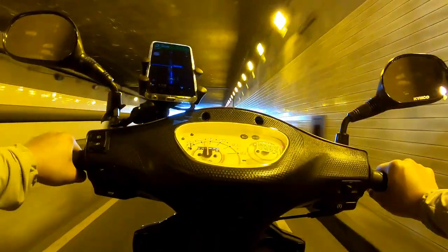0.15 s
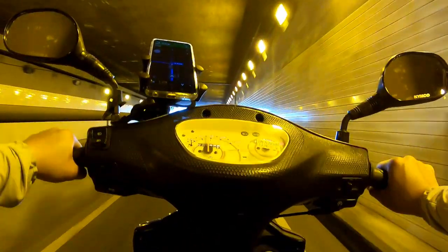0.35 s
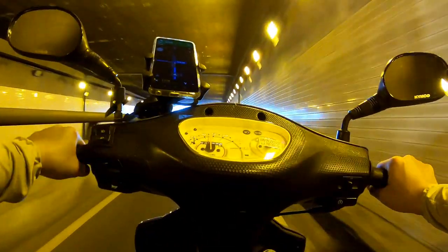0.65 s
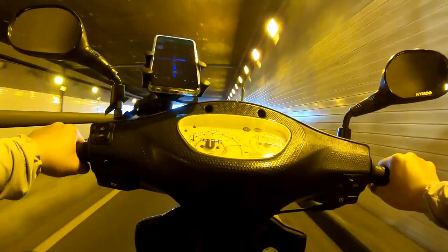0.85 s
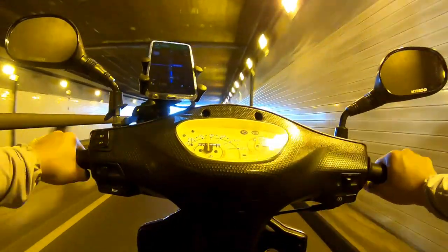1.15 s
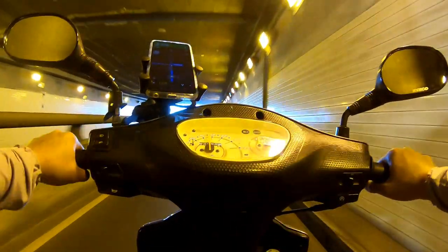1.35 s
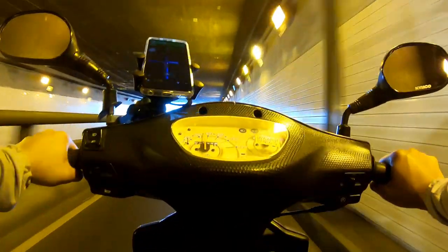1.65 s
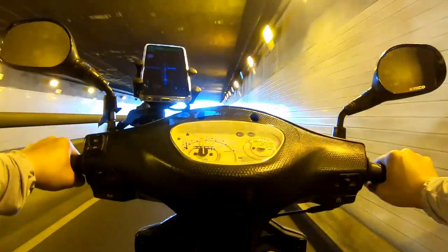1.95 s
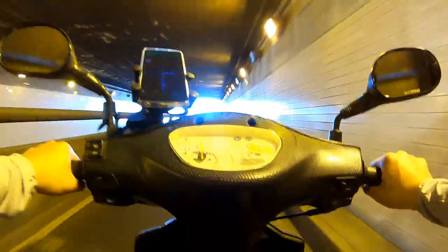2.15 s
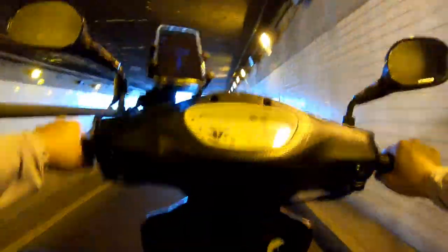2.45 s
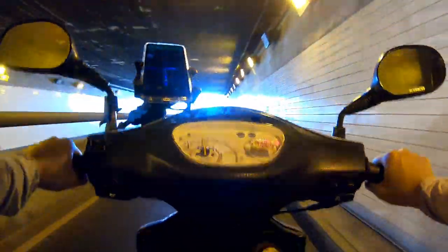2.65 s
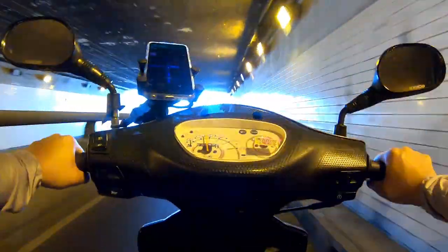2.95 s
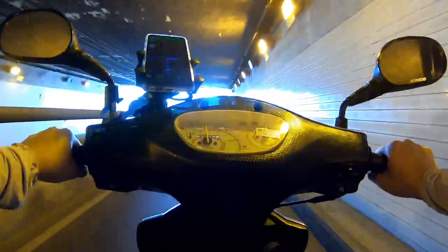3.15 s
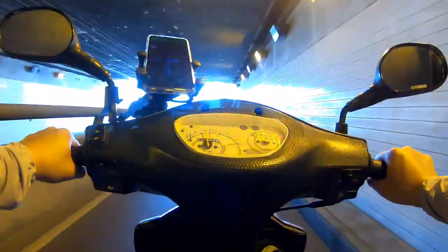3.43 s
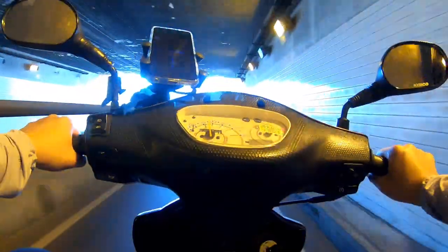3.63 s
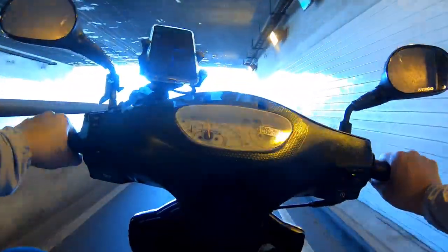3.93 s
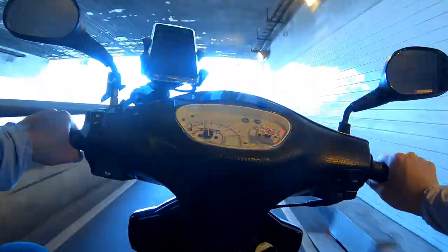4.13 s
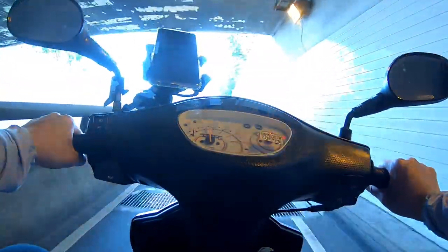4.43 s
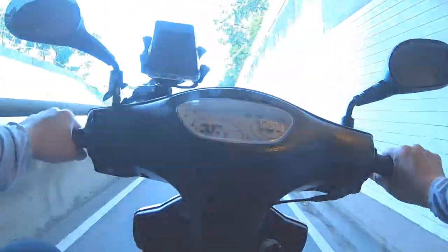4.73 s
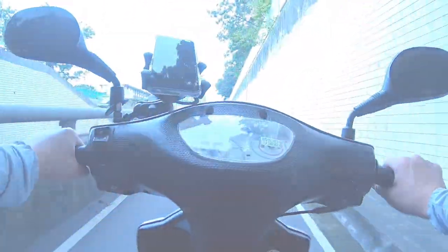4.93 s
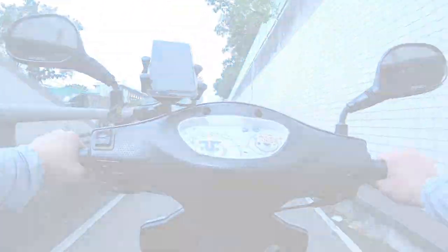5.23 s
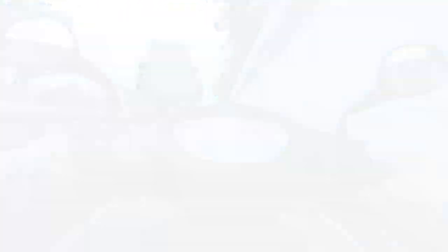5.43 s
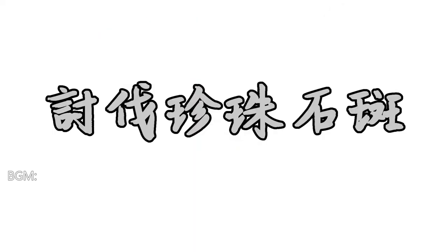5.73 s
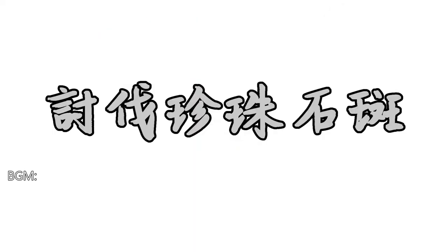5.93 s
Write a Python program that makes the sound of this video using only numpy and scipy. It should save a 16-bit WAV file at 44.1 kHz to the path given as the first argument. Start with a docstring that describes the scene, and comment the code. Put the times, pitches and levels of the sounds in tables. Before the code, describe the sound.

Strong, rough wind batters a close microphone throughout a scooter ride, thumping, tearing and spitting irregular pops. The little engine hums close by, raspy and slightly wavering, its boom swelling and fading with the tunnel's short dull echo. Its pitch dips slightly, then gradually recovers, with a faint high whine returning later. Airy road hiss continues until the sound is cut dead, followed by silence.

```python
"""Wind pounds a microphone at a rider's chest as a small four-stroke scooter cruises through a road tunnel.
Its gusts, flutter, rush, crackles and pops are shaped noise and single spikes over the hiss of tyres and air.
Close by, the engine's orders drone, boom and rasp as wavering sines, its covers buzz as resonant noise,
and the final drive whines; sizzles flare briefly and the tube echoes the machine.
The throttle eases briefly, then opens again. The sound is cut off abruptly, leaving silence."""
import sys
import numpy as np
from scipy import signal
from scipy.fft import rfft, irfft, next_fast_len
from scipy.io import wavfile
from scipy.ndimage import uniform_filter1d, map_coordinates

SR = 44100
rng = np.random.default_rng(int(sys.argv[2]) if len(sys.argv) > 2 else 0)


def store_pcm(level_fs):
    """Save levels as 16-bit WAV."""
    pcm = np.round(np.clip(level_fs, -1, 1) * 32767).astype(np.int16)
    wavfile.write(sys.argv[1], SR, np.atleast_2d(pcm).T)


N = 268200


def amp(db):
    """Decibels to gain."""
    return 10 ** (np.asarray(db) / 20)


def unit(x):
    """x at rms 1."""
    return x / np.sqrt(np.mean(x ** 2) + 1e-20)


def even(x, seconds):
    """x at rms 1 in every stretch of the given length."""
    return x / np.sqrt(np.abs(uniform_filter1d(x ** 2, int(seconds * SR))) + 1e-9)


def along(points, hz):
    """(Hz, value) points read on a log frequency axis."""
    f, v = np.transpose(points)
    return np.interp(np.log(hz + 1), np.log(f + 1), v)


def clock():
    """The time of every sample, in seconds."""
    return np.arange(N) / SR


def curves(rows):
    """One value per sample for each column after the time."""
    s, *cols = np.transpose(rows)
    return [np.interp(clock(), s, c) for c in cols]


def bump(s, half_length):
    """A smooth rise to 1 and fall around the time s."""
    return np.exp(-.5 * ((clock() - s) / half_length) ** 2)


def wobble(rate):
    """A smooth random curve, rate knots a second."""
    return map_coordinates(rng.standard_normal(int(N * rate / SR) + 4), [clock() * rate])


def filtered(x, response):
    """x times a response of frequency."""
    m = next_fast_len(N + SR // 2)
    spectrum = rfft(x, m) * response(np.fft.rfftfreq(m, 1 / SR))
    return irfft(spectrum, m)[:N]


def coloured(x, spectrum):
    """x shaped by (Hz, dB) points, at rms 1."""
    return unit(filtered(x, lambda hz: amp(along(spectrum, hz))))


def noise(spectrum, swell_db=0):
    """Noise of rms 1 whose source strength follows swell_db."""
    return coloured(rng.standard_normal(N) * amp(swell_db), spectrum)


def partial(cycles, db, flicker_db, smear):
    """One line, its level (dB) and phase (smear, radians) shaken by moving air and wall echoes."""
    level = np.sqrt(2) * amp(db + flicker_db * wobble(9))
    turns = cycles + rng.random()
    return level * np.sin(2 * np.pi * turns + smear * wobble(16))


# Strength of the airstream along the ride: time_s, flow_db
AIRSTREAM = [(0, -1), (.2, 0), (.6, -1), (1.43, .5), (1.62, -2), (2, -0.26), (2.8, -0.1), (3, -1.5),
             (3.55, -1), (3.9, 1.2), (4.85, 1.5), (5.54, 1)]


def airstream():
    """The flow in dB, which drives the wind, the covers and the rasp."""
    return curves(AIRSTREAM)[0]


# Strong gusts at the microphone, lulls where negative:
# centre_s, half_length_s, buffet_rise_db, flutter_rise_db, rush_rise_db
GUSTS = [(0.125, 0.0091, -16.5, -10, -2.5), (0.144, .004, -0.5, 0, 8.5), (0.414, 0.033, 3.5, 3, 1.5),
         (0.615, 0.092, -4, 2, -0.5), (.725, 0.0098, 0, 5, -0.5), (1.16, 0.03, 1.5, 5.5, -2),
         (1.264, 0.016, 3.5, 7, -3.5), (1.45, 0.022, -1, 2, 2), (1.584, 0.0096, -3.5, -8.5, -1.5),
         (2.057, 0.04, 3, 2, 1), (2.482, 0.026, 2, 4.5, 2), (2.795, 0.017, 6.5, 5, -1),
         (2.898, 0.03, 5, 2, 0), (3.172, 0.02, 1.5, 3, -3.5), (3.29, 0.017, 4, 3.5, 1.5),
         (3.401, 0.019, 6, 4, 1.5), (4.179, 0.012, 9.5, 5.5, -0.5), (4.234, 0.019, -4.5, -4.5, 1),
         (4.367, 0.015, 6, -2, 2), (4.55, .03, 3, 2, 0), (5.175, 0.042, 3, 2.5, 0.5),
         (5.299, .012, 3.5, -1, -3.5), (5.395, 0.0096, 6.5, 7, -1), (5.45, 0.023, 2, 3, 0.5)]


def gust_rises():
    """How far each gust lifts the buffet, the flutter and the rush, in dB."""
    return [sum(row[column] * bump(row[0], row[1]) for row in GUSTS) for column in (2, 3, 4)]


# Deep thump of air on the microphone, relative: pitch_hz, level_db_per_hz
BUFFET = [(12, -21), (22, -5.5), (34, 1), (55, 2), (90, -3), (135, -6), (200, -19.5), (400, -50),
          (1000, -100)]


def buffet(level_db, gust):
    """Big eddies thump the microphone."""
    return amp(level_db) * even(noise(BUFFET, 0.36 * gust), seconds=0.2)


# Tearing of smaller eddies at the microphone, relative: pitch_hz, level_db_per_hz
FLUTTER = [(60, -34.5), (130, -3.5), (185, 1.5), (250, -7), (330, -7.5), (450, -13.5), (650, -20),
           (1200, -30.5), (4000, -86)]


def flutter(level_db, gust, eddies):
    """Smaller eddies tear at the microphone in quick bursts."""
    return amp(level_db) * even(noise(FLUTTER, 1.6 * gust + 1.0 * eddies), seconds=.16)


# Mid-range rush of air past the microphone, relative: pitch_hz, level_db_per_hz
RUSH = [(200, -10), (450, 0.5), (600, 2), (780, 0), (1020, 0), (1300, 0), (1580, -3.5), (1850, -5),
        (2150, -15.5), (2800, -17.5), (4000, -33.5), (6000, -33.5), (12000, -74.5)]


def rush(level_db, gust, eddies):
    """Fine turbulence rushes with a rough, fast flicker."""
    swell_db = 0.83 * gust + 1.1 * eddies + 1.7 * wobble(1500)
    return amp(level_db) * even(noise(RUSH, swell_db), seconds=0.12)


# Colour of the small crackles at the microphone, relative: pitch_hz, level_db_per_hz
CRACKLE = [(200, -16), (600, 3.5), (1300, -1.5), (1800, -3), (2200, -12), (2900, -17), (4000, -30.5),
           (6000, -39.5), (12000, -76)]
CRACKLES_PER_S = 240  # at an eddy strength of 0 dB


def crackle(level_db, eddy_db):
    """Small pressure spikes of uneven size that crowd into the strong eddies."""
    struck = rng.random(N) < CRACKLES_PER_S * amp(2 * eddy_db) / SR
    sizes = rng.choice([-1, 1], N) * amp(rng.uniform(-4.05, 4.32, N))
    return amp(level_db) * even(coloured(struck * sizes, CRACKLE), seconds=0.15)


# levels at a flow of 0 dB, before sway and gusts
BUFFET_DB, FLUTTER_DB, RUSH_DB, CRACKLE_DB = -23.5, -29, -36.9, -39.9
BUFFET_GROWS, FLUTTER_GROWS = 0.43, 0.76  # dB per dB of flow


def wind():
    """Eddies hit the microphone: big ones thump, small ones tear and crackle, all in the same gusts."""
    flow_db = airstream()
    sway, gust, eddies = wobble(16), wobble(42), wobble(170)
    buffet_rise, flutter_rise, rush_rise = gust_rises()
    buffet_db = BUFFET_DB + BUFFET_GROWS * flow_db + 0.59 * sway + buffet_rise
    flutter_db = FLUTTER_DB + FLUTTER_GROWS * flow_db + 0.77 * sway + flutter_rise
    rush_db = flow_db + rush_rise
    thumps = buffet(buffet_db, gust)
    tearing = flutter(flutter_db, gust, eddies)
    rushing = rush(RUSH_DB + rush_db, gust, eddies)
    sputter = crackle(CRACKLE_DB + rush_db, 1.1 * gust + 1.5 * eddies)
    return thumps + tearing + rushing + sputter


# Engine speed: time_s, firings_per_s
SPEED = [(0, 42.7), (.3, 43.1), (1.1, 43.1), (1.4, 40.6), (1.65, 38.2), (1.85, 40.1), (2, 41.1),
         (2.3, 41.2), (2.5, 42.2), (2.65, 41.7), (3.7, 41.9), (4, 42.7), (4.25, 43.3), (5.54, 43.9)]
CRUISE_RATE = 42.9  # firings per s with the throttle held open


def engine_cycles():
    """Firings counted so far; the crank runs slightly unevenly."""
    rate = curves(SPEED)[0] * (1 + 0.0015 * wobble(14))
    return np.cumsum(rate) / SR


def revs():
    """Firings per second above the cruising rate; negative while the throttle is eased."""
    return curves(SPEED)[0] - CRUISE_RATE


# Steadier engine orders: firing_rate_multiple, level_db (before the 1.5 dB cut in exhaust)
ORDERS = [(2, -34.5), (4, -39), (5, -44.5), (7, -54), (10, -48.5), (12, -52), (23, -52.5)]
INTAKE_ORDER, INTAKE_DB = 36, -53  # a high order that sings under load
SLACK_DB_PER_RATE = 5  # its loss for each firing per s below cruise


def exhaust(cycles):
    """Multiples of the firing rate: one sings under load, the rest stay level."""
    rest = sum(partial(round(k) * cycles, db, flicker_db=2.5, smear=0.23) for k, db in ORDERS)
    intake_db = INTAKE_DB + SLACK_DB_PER_RATE * np.minimum(revs(), 0)
    intake = partial(INTAKE_ORDER * cycles, intake_db, flicker_db=2.5, smear=1.0)
    return amp(-1.5) * rest + intake


# Passages through the tunnel's standing waves: start_s, end_s, firing_rate_multiple, rise_db
# (short passages do not reach the full rise)
SWELLS = [(0, .6, 8, 6), (0, .48, 9, 7.5), (0, .8, 11, 4), (.77, 1, 8, 15.5), (1, 1.3, 8, 5),
          (1.75, 3.15, 11, 11.7), (2.42, 2.62, 11, 5), (2.35, 4.05, 9, 5.5), (2.5, 3.15, 8, 9.5),
          (3.68, 4.25, 8, 9), (3.84, 4.2, 8, 8), (4.25, 5.1, 8, 5.5), (4.05, 5.08, 9, 8.5),
          (4.12, 5.3, 11, 10), (5.27, 5.6, 8, 11.5)]
SWELL_EDGE_S = 0.095  # time constant of entering or leaving a standing wave


def standing_waves(order):
    """The dB that the tube adds to one engine order along the way."""
    past = lambda s: .5 + .5 * np.tanh((clock() - s) / SWELL_EDGE_S)
    return sum(db * (past(start) - past(end)) for start, end, k, db in SWELLS if k == round(order))


# Booming orders outside the standing waves: firing_rate_multiple, level_db
BOOMING = [(8, -47.5), (9, -48), (11, -53.5)]


def boom(cycles):
    """Three orders boom in the silencer and swell in the tube's standing waves."""
    return sum(partial(k * cycles, db + standing_waves(k), flicker_db=1.7, smear=.55) for k, db in BOOMING)


# Level of the high engine orders at a flow of 0 dB: pitch_hz, level_db
RASP = [(950, -55), (1200, -59), (1450, -57), (1570, -53.5), (1650, -58.5)]
RASP_ORDERS = range(22, 39)  # multiples of the firing rate


def rasp(cycles):
    """The engine's high orders fade in and out among the wall echoes as wavering tones."""
    flow_db = airstream()
    tones = 0
    for k in RASP_ORDERS:
        level_db = flow_db + along(RASP, k * CRUISE_RATE)
        tones = tones + partial(k * cycles, level_db, flicker_db=4, smear=.6)
    return tones


def resonant(resonances):
    """Noise of rms 1 ringing in (Hz, width Hz, dB) resonances."""
    response = lambda f: sum(amp(db) / (1 + (2 * (f - hz) / width) ** 2) for hz, width, db in resonances)
    return unit(filtered(rng.standard_normal(N), response))


# Resonances of the engine's covers: pitch_hz, width_hz, relative_level_db
COVERS = [(1530, 130, 0.5), (2464, 130, -6), (2964, 72, -11.5), (3110, 120, -15)]
COVERS_DB = -52  # at cruise and a flow of 0 dB, before the pulse
COVERS_DB_PER_RATE = 0.2  # the covers quieten as the engine slows
COVERS_PULSE_DB = 3  # swing either way, once per firing


def covers(cycles):
    """Each firing shakes the engine's covers into a narrow, buzzing rasp."""
    pulse_db = COVERS_PULSE_DB * np.cos(2 * np.pi * cycles)
    level_db = COVERS_DB + airstream() + COVERS_DB_PER_RATE * revs() + pulse_db
    return amp(level_db) * resonant(COVERS)


# Final drive whine, tied to road speed: time_s, pitch_hz
WHINE_PITCH = [(0, 2704), (.4, 2724), (1.1, 2716), (1.35, 2690), (1.6, 2600), (3.4, 2625), (4.15, 2685),
               (4.5, 2695), (4.8, 2715), (5.54, 2728)]
# Its level, which sinks while the throttle is eased: time_s, level_db
WHINE_LEVEL = [(0, -59.5), (.25, -57.5), (.52, -56.5), (.64, -63), (.8, -58.5), (1.3, -62), (1.55, -62),
               (1.7, -76), (3.4, -70), (4, -64), (4.15, -55), (4.35, -66), (4.55, -56.5), (4.82, -53),
               (5.07, -61), (5.28, -57.5), (5.4, -53), (5.54, -59.5)]
SIDEBAND_DB = -11.5  # relative to the whine


def gear():
    """The drive's teeth whine, loudest under load; the engine's fifth order shakes out a weaker sideband."""
    db, = curves(WHINE_LEVEL)
    teeth = np.cumsum(curves(WHINE_PITCH)[0]) / SR
    sideband = teeth + 5 * engine_cycles()
    whine = partial(teeth, db, flicker_db=2.1, smear=.68)
    return whine + partial(sideband, db + SIDEBAND_DB, flicker_db=2.5, smear=.6)


# Colour of the tyre and air hiss, relative: pitch_hz, level_db_per_hz
HISS = [(900, -16.5), (2000, -2), (2800, -1.5), (3800, -1), (4300, -5.5), (4950, -5.5), (5600, -14.5),
        (7000, -22), (7950, -17), (8600, -21.5), (10200, -23), (11300, -32.5), (12200, -45.5),
        (13600, -44.5), (15500, -55.5)]
# Its level along the ride: time_s, level_db
HISS_LEVEL = [(0, -51.5), (.55, -51), (.95, -48.8), (1.2, -50), (1.6, -53), (2, -51.5), (2.6, -49.5),
              (3.1, -52), (3.6, -50.5), (4.1, -48.6), (4.6, -48.5), (4.95, -48), (5.54, -49.5)]


def road(cycles):
    """Tyre and air hiss that swells and sinks slowly, with a faint valve rattle once per firing."""
    rattle_db = .5 * np.cos(2 * np.pi * cycles)
    return amp(curves(HISS_LEVEL)[0]) * noise(HISS, rattle_db + 1.0 * wobble(60))


# Echo time of the concrete tube: pitch_hz, t60_s
TUNNEL = [(100, 2.2), (1000, 0.18), (8000, 0.46)]


def tunnel(x):
    """The concrete tube's echo, a decaying noise tail one second long, longest in the bass."""
    hz, t, z = signal.stft(rng.standard_normal(SR), SR, nperseg=256)
    decay = amp(-60 * t / along(TUNNEL, hz)[:, None])
    tail = signal.istft(z * decay, SR, nperseg=256)[1]
    return signal.fftconvolve(x, tail / np.linalg.norm(tail))[:N]


# Sharp wind pops on the microphone: time_s, peak_db, brightness_db_per_octave
POPS = [(.3536, -21.5, -1.5), (.7193, -23, -1), (.8172, -19, .5), (.9745, -21.5, -1), (1.0951, -22, 2),
        (1.4535, -14.5, 2.5), (2.4711, -24, 1), (2.4718, -20, 1), (2.6689, -21, -3), (2.8163, -15.5, .5),
        (3.1084, -24, 2), (3.2856, -25, -1), (3.8117, -19, 2), (3.8129, -22, 3), (3.921, -20.5, 1.5),
        (4.1453, -21, 0), (4.6736, -20.5, 0), (4.8185, -17, 0), (4.8469, -18, 3), (4.8479, -21, 2),
        (5.0385, -22, -1.5), (5.2728, -20, 0)]
# Colour of a pop before its brightness tilt, relative: pitch_hz, level_db_per_hz
POP = [(150, -20), (700, -9), (1200, 2), (1800, 2.5), (2400, -8), (2900, -7), (3700, -22), (4550, -18),
       (5500, -37), (7000, -48), (12000, -78)]


def pops(size=1024):
    """Each pop is one brief pressure spike with its own brightness."""
    out, hz = np.zeros(N), np.fft.rfftfreq(size, 1 / SR)
    for s, db, brightness in POPS:
        spectrum = amp(along(POP, hz) + brightness * np.log2(hz + 1))
        spike = np.fft.fftshift(irfft(spectrum))
        start = round(s * SR) - size // 2
        out[start:][:size] += amp(db) * spike / np.abs(spike).max()
    return out


# Brief sizzles: centre_s, level_db, half_length_s
SPITS = [(2.238, -47.8, .006), (3.109, -53, .002), (4.849, -52, .003)]
# Their colour, relative: pitch_hz, level_db_per_hz
SPIT = [(2000, -20), (4000, 3), (5300, -1), (6200, 2), (7000, -7), (8400, -9), (9500, -24), (14000, -48)]


def spits():
    """Brief bright sizzles of noise that swell and fade."""
    return noise(SPIT) * sum(amp(db) * bump(s, half_length) for s, db, half_length in SPITS)


def scene():
    """The machine sounds into the tunnel; the wind exists only at the microphone."""
    cycles = engine_cycles()
    machine = exhaust(cycles) + gear() + covers(cycles) + rasp(cycles) + spits()
    echo = amp(-12.5) * tunnel(machine)
    return (machine + echo + boom(cycles) + road(cycles) + wind() + pops())[None]


END_S, TOP_HZ = 5.542, 15600  # end of the sound; band limit


def record(dry):
    """The sound stops dead over 3 ms, and nothing passes above the band limit."""
    gate = np.clip((END_S - clock()) / .003, 0, 1)
    return filtered(dry[0] * gate, lambda hz: hz < TOP_HZ)[None]


dry = scene()
out = record(dry)
store_pcm(out)
```